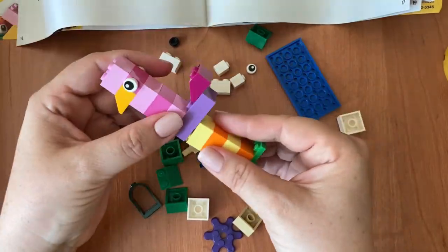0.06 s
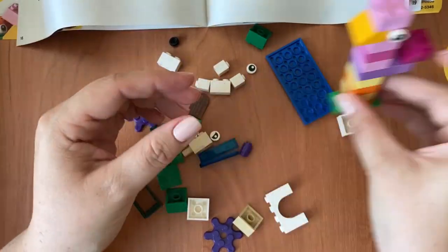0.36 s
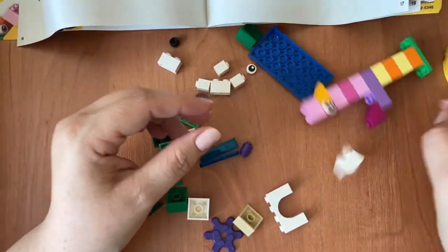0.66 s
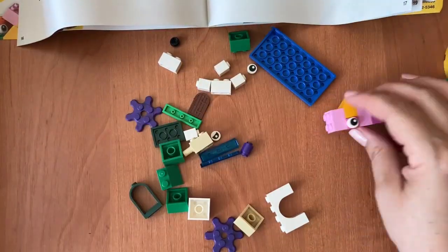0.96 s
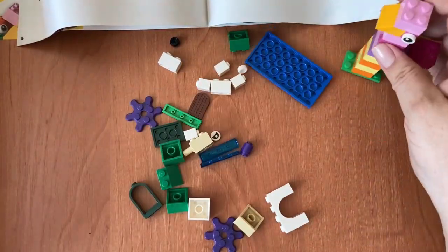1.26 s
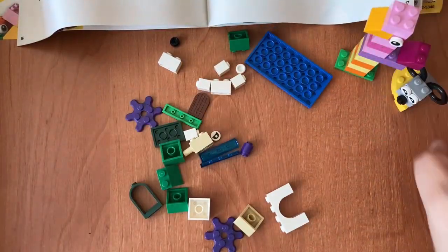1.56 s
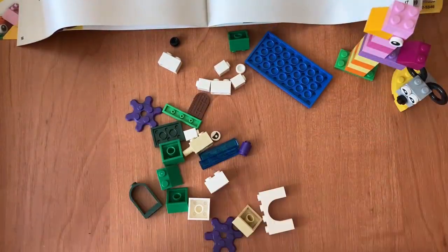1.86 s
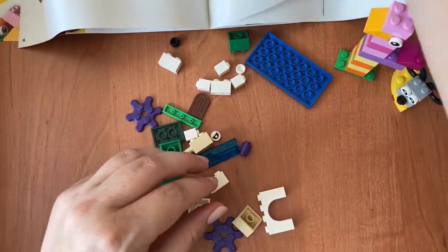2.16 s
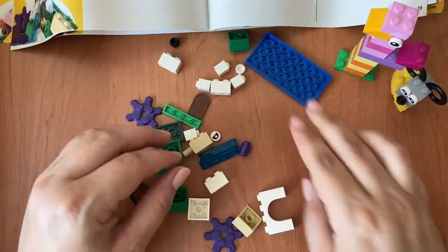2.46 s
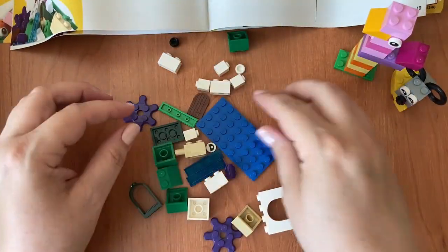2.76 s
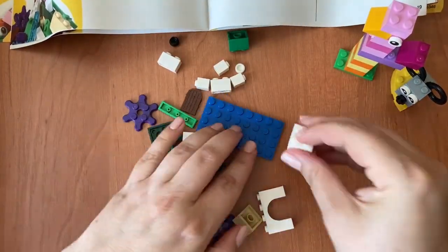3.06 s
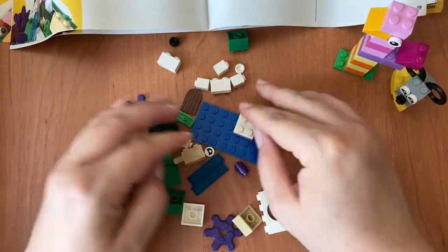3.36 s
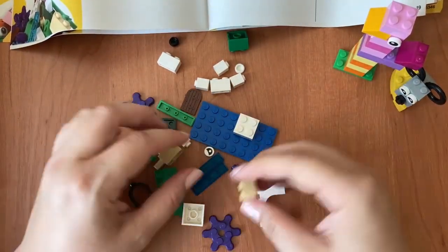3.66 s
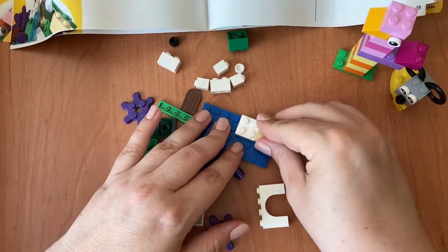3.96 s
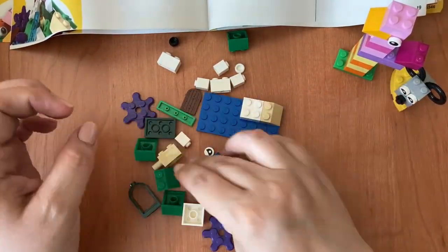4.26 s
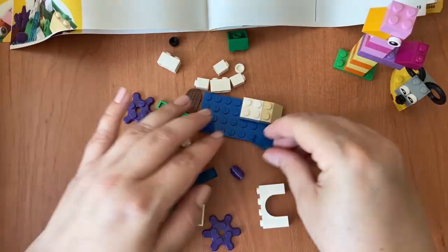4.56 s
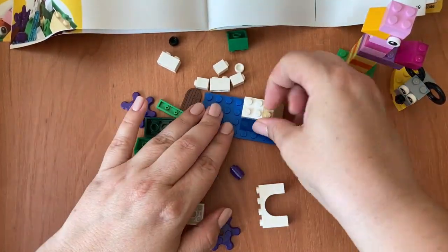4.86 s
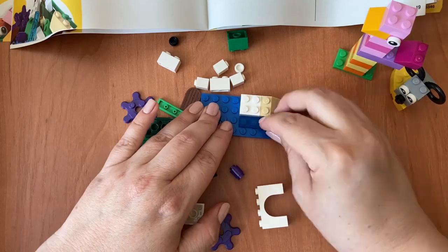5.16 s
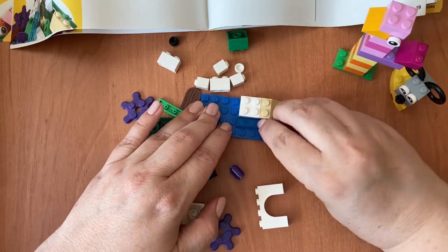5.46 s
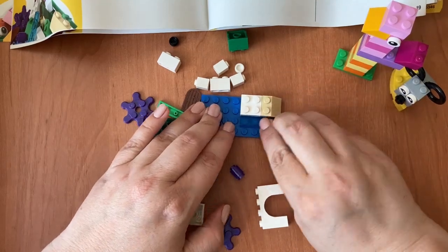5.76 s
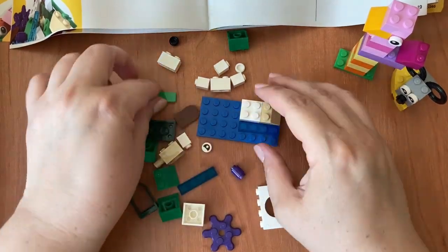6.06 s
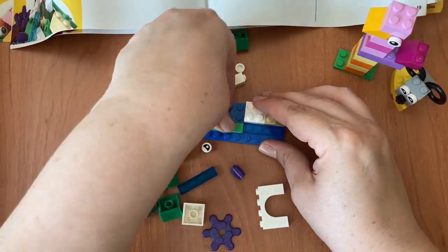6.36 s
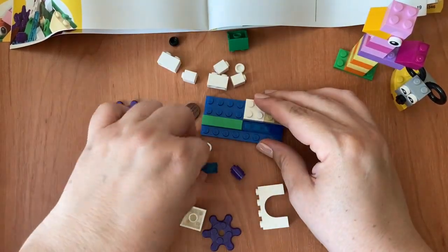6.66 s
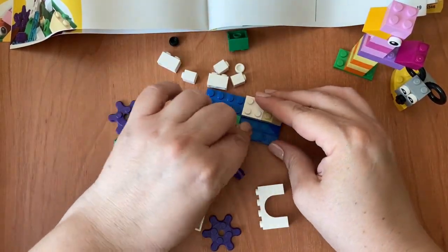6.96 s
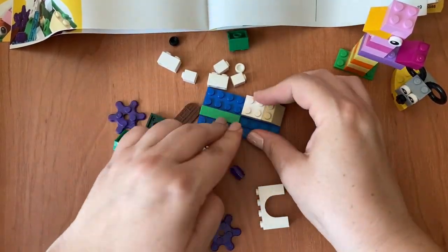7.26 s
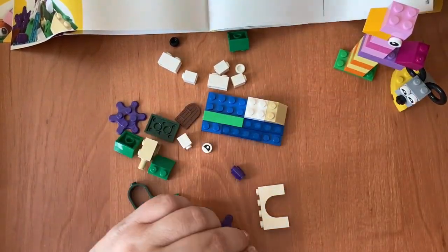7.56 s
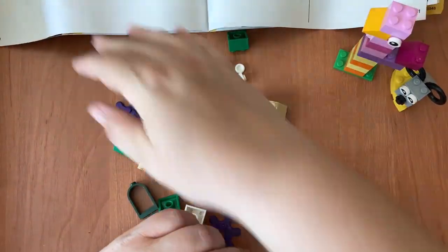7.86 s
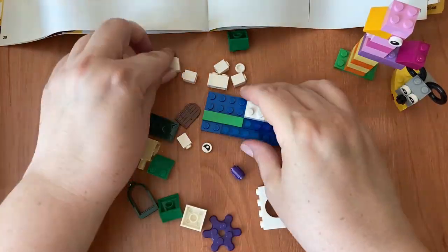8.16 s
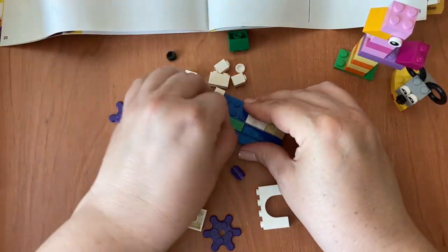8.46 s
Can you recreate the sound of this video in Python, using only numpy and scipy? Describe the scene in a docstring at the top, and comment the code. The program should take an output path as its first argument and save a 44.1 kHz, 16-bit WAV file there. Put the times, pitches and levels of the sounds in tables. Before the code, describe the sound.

Small hollow plastic bricks slide, squeak and tap on a wooden tabletop near the microphone, while a far motor hums faintly, drops in pitch and dies away. Crisp, uneven clicks and dull finger bumps go on as pieces are sorted. Past the middle come faint creaks, one loud snap and a burst of clicking, then softer taps and scrapes. The room is quiet, with little echo.

```python
"""Over a faint hum in a quiet room, plastic toy bricks scrape and click on a wooden table.
The hum, like a motor passing outside, sinks in pitch and fades. Sliding edges catch on tiny bumps,
nudge loose pieces and squeak as they stick and slip on the varnish. Fingers thud on the table top,
and each click rings a hollow brick and the wood. Later, studs creak as they are pressed into sockets."""
import sys
import numpy as np
from scipy import signal
from scipy.fft import rfft, irfft, next_fast_len
from scipy.io import wavfile
from scipy.ndimage import map_coordinates

SR = 44100
rng = np.random.default_rng(int(sys.argv[2]) if len(sys.argv) > 2 else 0)


def transcribe(u):
    """Save the signal u as a 16-bit wav file named by the first command-line argument.

    u: samples, shape (n,) or (channels, n), limited to [-1, 1]; the rate is SR.
    q: integer samples, one column per channel.
    """
    v = np.clip(np.atleast_2d(u).T, -1, 1)
    q = np.round(v * 32767).astype(np.int16)
    wavfile.write(sys.argv[1], SR, q)


N = 375732

# bricks and fingers sliding: t/s, length/s, level/dB, brightness/dB per octave, brick's hollow/Hz
SLIDE_STROKES = [(0.032, 0.025, -57.5, -1, 5700), (0.226, 0.16, -68.5, -5, 6500),
                 (0.547, 0.093, -62.5, -10, 4700), (0.647, 0.043, -43.5, 1, 8400),
                 (.68, 0.041, -38.5, -6.5, 2150), (0.712, 0.13, -29.5, 1, 7300),
                 (0.862, 0.13, -56.5, -4, 8600), (.985, .045, -39, -3, 5760),
                 (1.03, 0.039, -45, -6.5, 5960), (1.239, 0.028, -44.5, -0.5, 1540),
                 (1.298, 0.037, -38, 0.5, 13000), (1.357, 0.051, -58, -2, 6500),
                 (1.448, 0.038, -57.5, -6, 6500), (1.506, .035, -36, 0, 3530), (1.545, 0.05, -42, -2, 1420),
                 (1.796, 0.083, -49.5, -2.5, 1500), (1.949, 0.096, -61.5, 0, 7300),
                 (2.085, 0.29, -47, 0, 7000), (2.396, 0.12, -65, 4.5, 4820), (2.592, 0.068, -40.5, 7, 3900),
                 (2.69, .135, -43.5, 4, 4430), (2.95, 0.058, -50.5, 2.5, 6000),
                 (3.065, 0.013, -54, 1, 6000), (3.096, 0.028, -49, -1, 5500), (3.63, 0.094, -48, -2, 8600),
                 (3.871, 0.076, -56.5, 2, 7000), (4.118, 0.12, -61, -0.5, 4500),
                 (4.395, .025, -52.5, 4, 7000), (5.611, 0.14, -59, -2, 9250),
                 (5.951, 0.058, -42.5, -0.5, 4300), (6.068, 0.066, -51.5, 1.5, 8000),
                 (6.124, 0.025, -42, -4, 11340), (6.25, 0.035, -50, -3.5, 8000),
                 (6.327, 0.11, -61.5, -4, 8600), (6.609, 0.1, -52.5, 1, 8000), (6.731, .02, -57, 2.5, 9000),
                 (7.245, 0.026, -62, -7.5, 9200), (7.322, .08, -64.5, -4.5, 9200),
                 (7.59, 0.12, -54, 2, 8000), (7.844, 0.059, -55, 1, 7960), (8.176, 0.31, -65, -3.5, 8000)]
# the tones a hollow brick rings with: f/Hz, level/dB, t60/s (the time to fade by 60 dB)
BRICK_MODES = [(1690, -1, .05), (1880, -1, .05), (2420, 1, .05), (2900, -2, .04), (3160, -2, .04),
               (3530, -2, .04), (4150, -1, .035), (4450, 0, .035), (5300, -3, .03), (6400, -5, .025),
               (7400, -5, .02), (9100, -5, .02)]
# low wooden knock tones, plus a ring near 900 Hz at the squeaks' pitch: f/Hz, level/dB, t60/s
KNOCK_TONES = [(140, -17.5, 0.024), (204, -6, 0.81), (315, -2, 0.084), (414, -11, 0.065), (539, 3.5, 0.19),
               (673, -6, 0.11), (871.3, 1.5, 0.26), (957, -2.5, 0.15)]
# a thumb grinds studs into their sockets: t/s, length/s, level/dB
STUD_PRESSES = [(4.995, .045, -55.5), (5.064, 0.0079, -47), (5.115, 0.048, -63), (5.262, 0.039, -60.5),
                (5.376, 0.027, -45), (5.53, .032, -58.5)]
PAN_DB = -1  # left minus right: the pile lies a little to the right


def amp(db):
    """Turn decibels into a gain."""
    return 10 ** (np.asarray(db) / 20)


def unit(x):
    """Scale a signal to an average strength (rms) of 1."""
    return x / np.sqrt(np.mean(x ** 2) + 1e-20)


def along(points, hz):
    """Read between (f/Hz, value) points on a logarithmic frequency axis."""
    point_hz, values = np.transpose(points)
    return np.interp(np.log(hz + 1), np.log(point_hz), values)


def clock(seconds):
    """The sample times of a short stretch."""
    return np.arange(int(seconds * SR)) / SR


def wobble(rate, n):
    """A smooth random curve, n samples long, through `rate` random values a second."""
    return map_coordinates(rng.standard_normal(int(n * rate / SR) + 4), [np.arange(n) * rate / SR])


def filtered(x, gain):
    """Multiply the spectrum of x by a gain that depends on frequency."""
    n = x.shape[-1]
    padded = next_fast_len(n + 2048)
    return irfft(rfft(x, padded) * gain(np.fft.rfftfreq(padded, 1 / SR)), padded)[..., :n]


def shaped(x, spectrum):
    """Filter x with a curve of (f/Hz, level/dB) points."""
    return filtered(x, lambda hz: amp(along(spectrum, hz)))


def coloured(x, spectrum, tilt, hollow_hz, hollow_db, hollow_octaves=0.45, hinge_hz=2200):
    """Harder contacts are brighter by `tilt` dB per octave; the brick's hollow lifts one broad band."""
    def gain(hz):
        hollow = hollow_db * np.exp(-.5 * (np.log2((hz + 1) / hollow_hz) / hollow_octaves) ** 2)
        brightness = tilt * np.log2(1 + (hz / hinge_hz) ** 2) / 2
        return amp(along(spectrum, hz) + hollow + brightness)
    return filtered(x, gain)


def add(track, start, sound):
    """Mix a sound into a track at `start` seconds."""
    part = track[..., max(round(start * SR), 0):][..., :sound.shape[-1]]
    part += sound[..., :part.shape[-1]]


def ring(modes, scatter_db, detune):
    """The ringing after one blow, with energy 1; the spot struck changes each tone's share."""
    t = clock(.15)
    hz, db, t60 = np.transpose(modes)[:, :, None]
    size, shift, sign = rng.standard_normal((3, len(modes), 1))
    hz = hz * np.exp(detune * rng.standard_normal())  # every piece and spot has its own pitch
    fades = np.sign(sign) * amp(db + scatter_db * size - 60 * t / t60)
    ringing = np.sum(fades * np.sin(2 * np.pi * hz * (1 + detune * shift) * t), 0)
    return ringing / np.linalg.norm(ringing)


def placed(x, pan_db, lag_spread_samples=2.25):
    """Sound from a spot on the table reaches left and right with its own balance and tiny delay."""
    lag = lag_spread_samples * rng.standard_normal()
    sides = np.array([[.5], [-.5]])
    return filtered(x, lambda hz: amp(sides * pan_db) * np.exp(2j * np.pi * hz / SR * lag * sides))


def quiet_room(level_db=-70):
    """A low rumble, much alike in both ears, and a faint hiss that differs between them."""
    # the room's background noise: f/Hz, level/dB
    noise_spectrum = [(20, -60), (50, -10.5), (100, -22), (190, 3), (320, 4), (450, -1), (800, -5.5),
                      (1600, -11), (3500, -18.5), (4800, -14.5), (6200, -21.5), (14500, -24),
                      (16000, -70.5)]
    mid, side = shaped(rng.standard_normal((2, N)), noise_spectrum)
    side = shaped(side, [(200, -9), (900, -6), (3000, 0.5)])
    return amp(level_db + wobble(19, N)) * np.array([mid + side, mid - side]) / np.std(mid)


def motor(blur_db=-5, blur_rate=70):
    """A far motor hums through the wall and sinks as it passes; many paths make each tone waver."""
    # the passing motor: t/s, pitch/Hz, level/dB
    passing = [(0, 205.4, -66.5), (.9, 204, -54), (1.151, 197, -60), (1.35, 193.3, -47.5),
               (1.55, 187.7, -62.5), (1.8, 184.7, -67), (3.199, 185.5, -83.5)]
    # its lowest harmonics: multiple of the pitch, level/dB
    harmonics = [(1, -6), (2, -3.5), (3, -15)]
    times, hz, db = np.transpose(passing)
    t = np.arange(N) / SR
    pitch = np.interp(t, times, hz) * (1 + 0.0027 * wobble(20, N))
    phase = 2 * np.pi * np.cumsum(pitch) / SR
    hum = np.zeros(N)
    for multiple, level in harmonics:
        waver = 1 + amp(blur_db) * (wobble(blur_rate, N) + 1j * wobble(blur_rate, N))  # level and phase
        hum += amp(level) * np.real(waver * np.exp(1j * multiple * phase))
    return amp(np.interp(t, times, db)) * unit(hum)


def friction(strokes, tick_rate, spread_db, rise_s, fall_s, shell_db, knock_db, judder_db=3.5):
    """An edge catches on tiny bumps in clumps of ticks; each tick rings the brick and the knock tones."""
    # the tone colour of rubbing: f/Hz, level/dB
    rub_spectrum = [(30, -17.5), (120, -19.5), (300, 7.5), (1500, 4.5), (4800, 4), (6500, 1.5), (11000, 0),
                    (15500, -2)]
    out, t = np.zeros((2, N)), clock(.5)
    n = len(t)
    for start, length, db, tilt, hollow_hz in strokes:
        sizes = amp(spread_db * np.minimum(rng.exponential(size=n), 3) + judder_db * wobble(170, n))
        ticks = (rng.random(n) < tick_rate / SR) * sizes * rng.choice([-1, 1], n)
        fade_in = np.exp(-np.logaddexp(0, (2 * rise_s - t) * 2 / rise_s))
        fade_out = np.exp(-np.logaddexp(0, (t - length - rise_s) / fall_s))
        sag = amp(0.5 * (.5 - np.minimum(t / length, 1)))  # half a dB is lost as the hand slows
        rub = unit(coloured(ticks, rub_spectrum, tilt, hollow_hz, hollow_db=5.5))
        rub *= fade_in * fade_out * sag
        shell = amp(shell_db) * ring(BRICK_MODES, scatter_db=2, detune=.06)
        tones = amp(knock_db) * ring(KNOCK_TONES, scatter_db=2, detune=.03)
        scrape = rub + signal.fftconvolve(rub, shell + tones)[:n]
        add(out, start - 2 * rise_s, placed(amp(db) * scrape, PAN_DB))
    return out


def slides(gain_db=-3):
    """Bricks slide over the varnish, with ticks so dense that they blend into a scrape."""
    return amp(gain_db) * friction(SLIDE_STROKES, tick_rate=4500, spread_db=4, rise_s=.006,
                                   fall_s=0.0024, shell_db=-11.5, knock_db=-20)


def nudges(count=2, louder_db=4, spread_db=2, extra_tilt=2.3, knock_db=-22):
    """Every slide taps a few loose pieces at random moments; gives extra rows for clicks()."""
    rows = []
    for start, length, db, tilt, hollow_hz in SLIDE_STROKES:
        for when, force in rng.random((count, 2)):
            level = db + louder_db + spread_db * (2 * force - 1)
            rows.append((start + when * length, level, tilt + extra_tilt, hollow_hz, knock_db))
    return rows


def bumps(band_hz=(130, 600), push_t60=0.016, damping_t60=0.027, press_db=-53.5, gain_db=-3):
    """Soft fingers push on the table, so only the low knock tones answer."""
    # soft bumps of fingers and bricks on the table: t/s, level/dB
    touches = [(0.042, -51), (.52, -38.5), (1.238, -53), (1.333, -41), (2.417, -50), (4.051, -41.5),
               (4.074, -44.5), (4.925, -43.5), (5.886, -36.5), (8.018, -53.5), (8.075, -51.5),
               (8.117, -50.5), (8.487, -48.5)]
    mid_presses = [(start + length / 2, press_db) for start, length, _ in STUD_PRESSES]
    out, t = np.zeros(N), clock(.15)
    contact = np.sqrt(.008 * SR)  # gives a thud the energy of 8 ms at its level
    softness = signal.butter(3, band_hz, "bandpass", fs=SR, output="sos")
    for start, db in touches + mid_presses:
        push = rng.standard_normal(len(t)) * t * amp(-60 * t / push_t60)  # flesh yields: force builds up
        tones = ring(KNOCK_TONES, scatter_db=2.2, detune=0.027) * amp(-60 * t / damping_t60)
        thud = signal.sosfilt(softness, signal.fftconvolve(push, tones)[:len(t)])
        add(out, start, amp(db + gain_db) * contact * thud / np.linalg.norm(thud))
    return out


def snap(t, grit, scuff_db=-11, scuff_t60=0.01, crush_t60=0.0067):
    """Two edges scuff, give way in one spike at t = 0 and crush briefly; the energy is 1."""
    envelope = amp(np.where(t < 0, scuff_db + 60 * t / scuff_t60, -60 * t / crush_t60))
    noise = rng.standard_normal(len(t)) * envelope
    spectrum = rfft(grit * noise / np.linalg.norm(noise) + (t == 0))
    crack = irfft(spectrum / np.sqrt(np.abs(spectrum) + 1e-9), len(t))  # evens out peaks and dips
    return crack / np.linalg.norm(crack)


def clicks(shell_db=-15, knock_gain_db=-3, knock_t60=0.011, damping_t60=.07, pan_spread_db=2.5):
    """One edge snaps against another: a short crack, the brick's ring and a hand-damped knock."""
    # firm contacts: t/s, level/dB, brightness/dB per octave, brick's hollow/Hz, knock/dB
    contacts = [(0.094, -29.5, -1, 7100, -14.5), (0.5202, -44.5, -0.5, 1500, 2.5),
                (0.7164, -22, -4.5, 9500, -6.5), (0.7366, -29.5, -5, 6800, -0.5),
                (0.762, -37, 4, 7100, -22), (0.801, -36.5, -3.5, 7200, -43), (0.8294, -31.5, 16, 8500, -9),
                (1.0111, -29, 0, 6500, -11), (1.2992, -32.5, -0.5, 14000, -2.5),
                (1.304, -27, 1.5, 14100, -30), (1.8138, -28.5, 4, 9700, -32.5),
                (2.284, -31, 3.5, 6700, -24), (2.3195, -34, 6, 7600, -15), (2.6998, -30.5, 4, 5400, -48.5),
                (2.7841, -33.5, 5.5, 4800, -8.5), (2.809, -37.5, 5, 6850, -13.5),
                (2.8221, -25, 2, 8250, -18.5), (3.0678, -37, 4, 6000, -34), (3.107, -30.5, 4, 5400, -24),
                (3.2227, -30, 6.5, 4900, -19), (3.2877, -40.5, 2, 6800, -11),
                (3.3046, -38, -2.5, 13400, -8.5), (3.3887, -49, 0, 8500, -11),
                (3.4122, -33.5, -1.5, 9800, -18), (3.6915, -32.5, 1.5, 6800, -12.5),
                (3.7, -30, 3.5, 7600, -33), (3.7135, -36.5, 2, 7600, -33), (3.8796, -38.5, 6.5, 3800, -33),
                (3.9648, -38.5, 6, 4600, -15), (4.0016, -38.5, 2.5, 7700, -8),
                (4.2168, -43, 5.5, 6800, -38), (4.3436, -46.5, -1, 7700, -38), (4.3788, -38, 11, 4700, -41),
                (4.3914, -36.5, -2, 7300, -14), (4.6826, -47, 4.5, 9200, -6),
                (4.705, -40.5, 6.5, 4300, -7.5), (4.7649, -40, 1, 10700, -1.5),
                (4.7725, -33, 11, 4900, -12), (4.8056, -31.5, 2.5, 8000, -19),
                (4.9245, -32.5, 8.5, 4550, -13), (5.2024, -50.5, -4.5, 9000, -1),
                (5.4973, -40.5, 5, 3800, -6), (5.5697, -37, 4.5, 1500, -12), (5.7242, -19, 0.5, 2000, -11),
                (5.8267, -42, 0.5, 8000, -13), (5.924, -47.5, 1, 5200, -15),
                (5.9546, -27.5, 0.5, 11200, -11.5), (5.9598, -25.5, 4.5, 10700, -24),
                (5.975, -26.5, -4, 9500, -19.5), (5.999, -27.5, 3, 4100, -35),
                (6.0073, -23, 2.5, 4100, -30), (6.132, -29.5, -2, 12700, -12.5),
                (6.2796, -40, -1, 10400, -7.5), (6.3125, -43, -1, 12400, -13),
                (6.4754, -23.5, -3.5, 6500, -3.5), (6.61, -41, 2.5, 5300, -31),
                (6.659, -35, 2.5, 9100, -33), (6.85, -32, -0.5, 13500, -12.5), (6.985, -40, -1, 4300, -7),
                (7.0541, -35.5, 2.5, 3800, -2.5), (7.067, -26, 1, 4450, -9), (7.6403, -44, -0.5, 7100, -9),
                (7.757, -46, -1, 6050, -11), (7.7934, -44, 5.5, 5800, -33), (7.947, -51, 3.5, 3220, -21.5),
                (8.0748, -51.5, -2, 1700, -12), (8.188, -47.5, 2.5, 7550, -30),
                (8.3302, -46, 3.5, 8100, -8.5), (8.364, -41.5, -1.5, 9000, -10.5),
                (8.3889, -38, -2, 9500, -4.5)]
    # the tone colour of a crack: f/Hz, level/dB
    crack_spectrum = [(30, -9), (150, -7), (600, -0.5), (1500, 1.5), (4800, 4.5), (6500, -1), (11000, 0),
                      (15500, -3)]
    out, t = np.zeros((2, N)), clock(.15)
    contact = np.sqrt(.003 * SR)  # gives a crack the energy of 3 ms at its level
    lead = SR // 80  # samples of scuffing before the spike
    for start, db, tilt, hollow_hz, knock_db in contacts + nudges():
        grit = np.interp(db, [-45, -22], [2.6, .9])  # light touches graze, hard ones crack cleanly
        blow = snap(np.arange(-lead, len(t)) / SR, grit)
        blow[lead:] += amp(shell_db) * ring(BRICK_MODES, scatter_db=2, detune=.05)
        hit = coloured(blow, crack_spectrum, tilt, hollow_hz, hollow_db=7.5)
        hit /= np.linalg.norm(hit)
        push = rng.standard_normal(len(t)) * amp(-60 * t / knock_t60)
        tones = ring(KNOCK_TONES, scatter_db=1, detune=.025) * amp(-60 * t / damping_t60)
        knock = signal.fftconvolve(push, tones)[:len(t)]
        hit[lead:] += amp(knock_db + knock_gain_db) * knock / np.linalg.norm(knock)
        pan_db = PAN_DB + pan_spread_db * rng.standard_normal()
        add(out, start - lead / SR, placed(amp(db) * contact * hit, pan_db))
    return out


def squeaks(attack_s=0.0024, release_s=0.01, arch_octaves=0.079, jitter=0.24, rasp_db=-6, ring_db=-28):
    """Plastic sticks and slips hundreds of times a second; uneven slips turn the squeak into a rasp."""
    # squeaks on the varnish: t/s, length/s, pitch/Hz, glide/octaves, level/dB, roughness/0-1
    skids = [(0.519, 0.025, 853, -0.12, -35.5, 0.42), (1.239, .022, 887, -0.24, -42, 1),
             (1.33, 0.029, 928, -0.04, -40, 0.7), (1.454, 0.041, 944, -0.2, -49, 0.48),
             (1.538, 0.054, 1276, 0.74, -42.5, 0), (1.792, .054, 1385, -.1, -48, 0.2),
             (2.117, 0.039, 1076, 0.33, -39, 0.25), (2.212, 0.04, 914, 0.22, -36.5, 0.3),
             (2.34, 0.043, 745, -0.15, -40.5, 0.78), (2.401, 0.045, 752, -0.32, -42.5, 0.46),
             (4.695, 0.044, 749, -0.06, -46, .05), (4.699, .014, 13500, 0, -48, 0.14),
             (4.737, 0.024, 923, 0.2, -38.5, .05)]
    # the tone colour of the rasp: f/Hz, level/dB
    rasp_spectrum = [(100, -44.5), (350, 4.5), (900, -2.5), (1800, -3.5), (4000, -35.5), (9000, -23)]
    out, t = np.zeros(N), clock(.1)
    for start, length, middle_hz, octaves, db, rough in skids:
        progress = 2 * np.minimum(t / length, 1) - 1  # -1 at the start, 1 at the end
        # the slip is fastest in the middle, which bends the glide into an arch
        pitch = middle_hz * 2 ** (octaves * progress / 2 - arch_octaves * progress ** 2)
        pitch *= 1 + jitter * rough * wobble(800, len(t))
        phase = 2 * np.pi * np.cumsum(pitch) / SR
        overtones = (np.sin(2 * phase) + .5 * np.sin(3 * phase)) * (3 * middle_hz < SR / 2)
        slips = np.sin(phase) + amp(-28 + 16.12 * rough) * overtones
        rasp = shaped(rng.standard_normal(len(t)), rasp_spectrum)
        flutter = amp(5.3 * rough * wobble(382, len(t)))
        squeak = unit(slips * flutter) + amp(rasp_db) * rough * unit(rasp)
        grip = np.clip(t / attack_s, 0, 1) * np.clip((length - t) / release_s + .5, 0, 1)
        add(out, start, amp(db) * grip * unit(squeak))
    tones = ring(KNOCK_TONES, scatter_db=0.74, detune=0)
    return out + amp(ring_db) * signal.fftconvolve(out, tones)[:N]


def creaks(gain_db=-1, tilt=-4, hollow_hz=2000):
    """A tight stud gives way in separate small slips as it is pressed into its socket."""
    strokes = [(start, length, db, tilt, hollow_hz) for start, length, db in STUD_PRESSES]
    return amp(gain_db) * friction(strokes, tick_rate=1500, spread_db=4.5, rise_s=.003,
                                   fall_s=0.0042, shell_db=-21, knock_db=-12)


def reflections(x, near_t60=0.077, near_db=-6, far_db=-18):
    """The table, hands and booklet scatter each sound at once; the walls add a faint longer tail."""
    # how long the room echoes: f/Hz, t60/s
    room_decay = [(150, .3), (1000, 0.32), (5000, 0.2), (15000, 0.11)]
    out, hop = np.zeros((2, N)), SR // 4
    for start in range(0, N, hop):  # each quarter second gets its own random echo
        hz, frame_times, bands = signal.stft(rng.standard_normal((4, hop)), SR, nperseg=128)
        fades = amp(-60 * frame_times / along(room_decay, hz)[:, None])
        far = signal.istft(bands[:2] * fades, SR, nperseg=128)[1]
        t = np.arange(far.shape[1]) / SR
        near = rng.standard_normal(far.shape) * amp(-60 * t / near_t60) * (1 - np.exp(-t / 0.0026))
        near = amp(near_db) * near / np.linalg.norm(near[0])
        mid, side = near + amp(far_db) * far / np.linalg.norm(far[0])
        # left and right differ most in the treble
        side = shaped(side, [(300, 1), (900, -2), (2500, 1.5), (9000, 4)])
        tail = np.array([mid + side, mid - side]) / np.sqrt(2)
        add(out, start / SR, signal.fftconvolve(x[:, start:start + hop], tail, axes=1))
    return out


def scene():
    """Bricks on the table, their reflections, the far motor and the quiet room."""
    bricks = clicks() + slides() + creaks() + squeaks() + bumps()
    return bricks + reflections(bricks) + motor() + quiet_room()


def record(dry):
    """The very highest treble is cut off steeply."""
    top_hz = 16100
    return filtered(dry, lambda hz: 1 / np.sqrt(1 + (hz / top_hz) ** 160))


dry = scene()
out = record(dry)
transcribe(out)
```